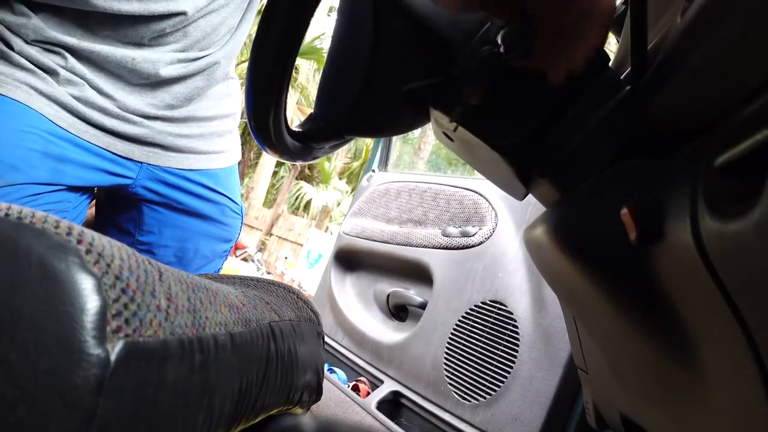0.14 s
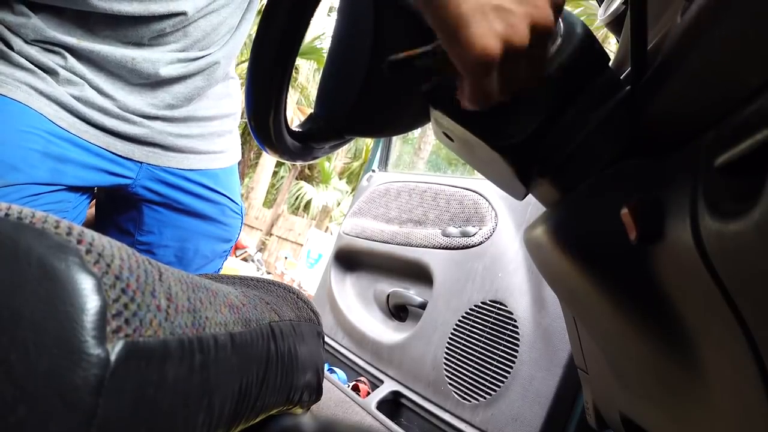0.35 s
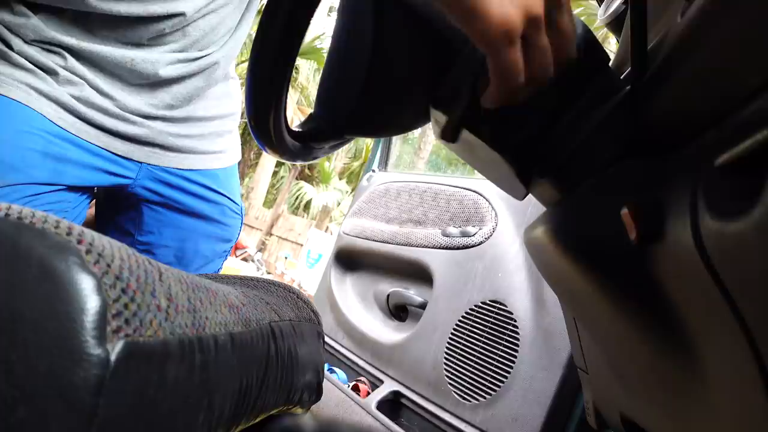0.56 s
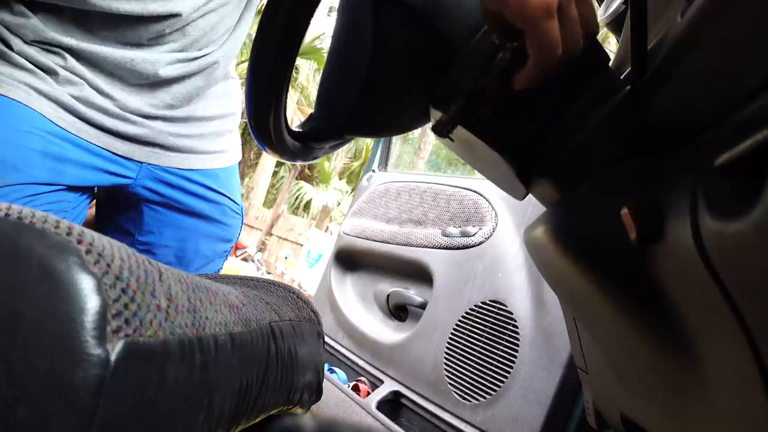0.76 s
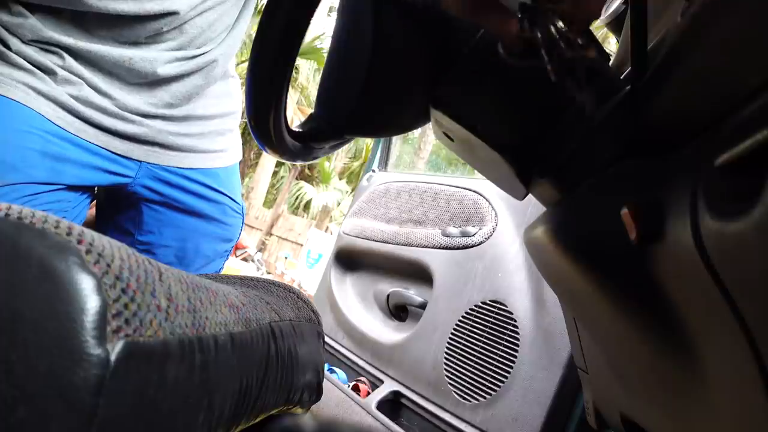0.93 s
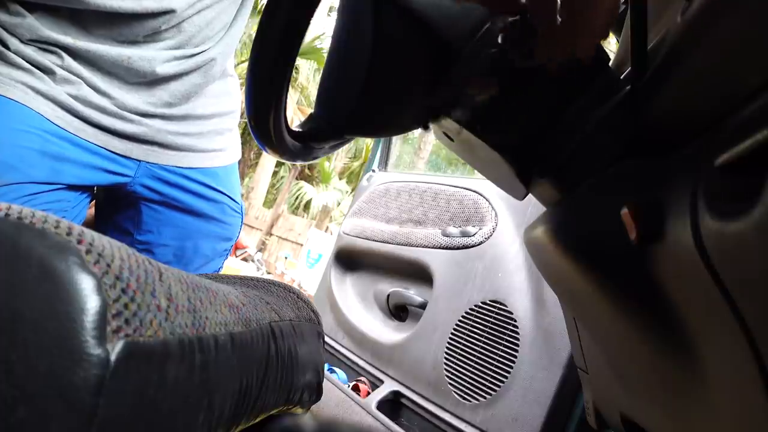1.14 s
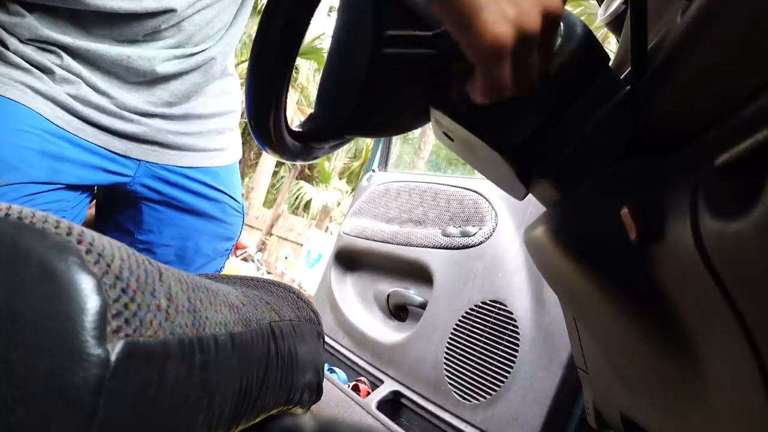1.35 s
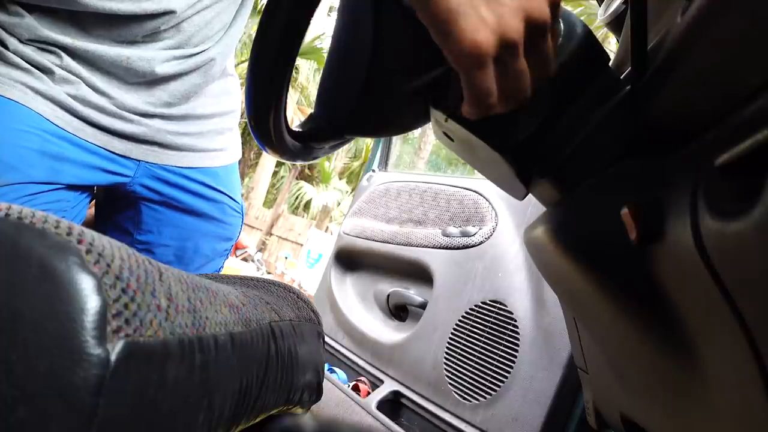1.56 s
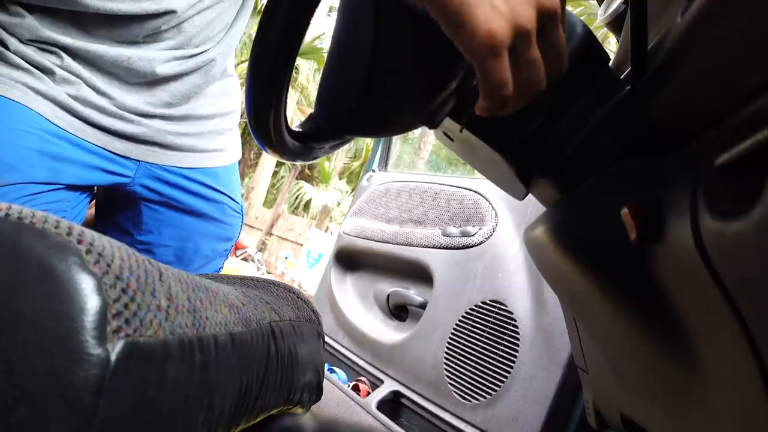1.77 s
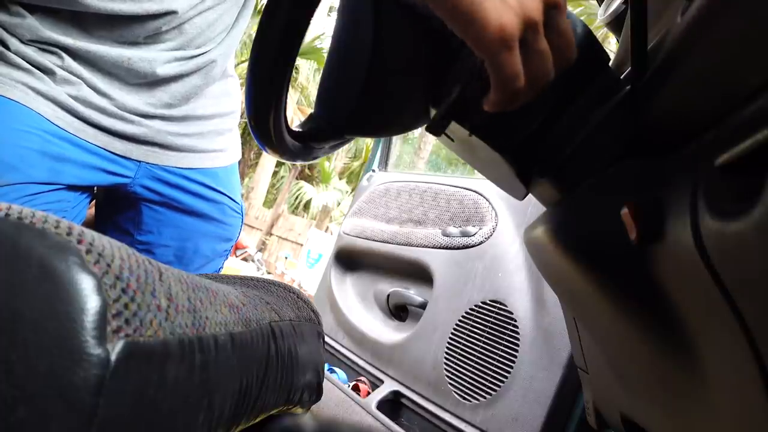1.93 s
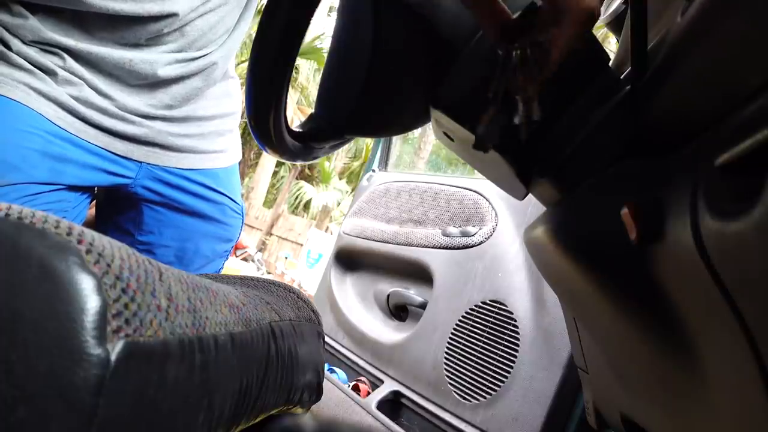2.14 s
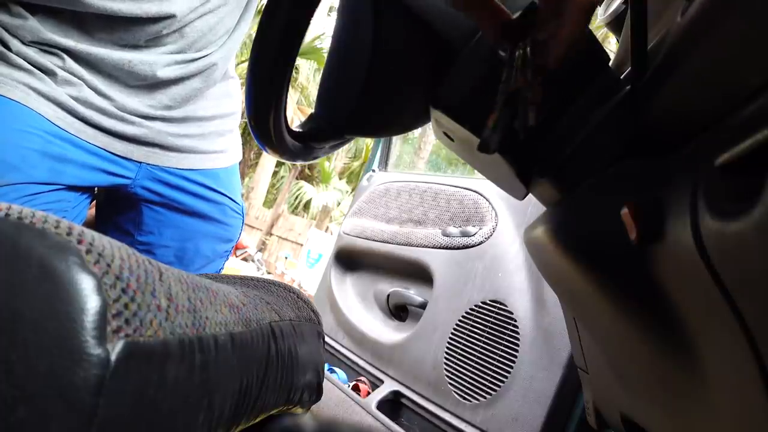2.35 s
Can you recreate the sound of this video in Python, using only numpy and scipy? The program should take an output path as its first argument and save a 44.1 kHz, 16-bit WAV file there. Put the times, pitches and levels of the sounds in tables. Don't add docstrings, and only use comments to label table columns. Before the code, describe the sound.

Car keys worked in an ignition lock: light ticks, then tight bursts of hard clunks, jingles and blade scrapes, a pause and a last knock; close, small dull cabin, low handling rumble, faint insects outside.

```python
import sys
import numpy as np
from scipy import signal
from scipy.fft import rfft, irfft
from scipy.io import wavfile
from scipy.ndimage import uniform_filter1d

SR = 44100
rng = np.random.default_rng(int(sys.argv[2]) if len(sys.argv) > 2 else 0)


def undo_db(level):
    steps = np.asarray(level, float) / 20
    return 10 ** steps


def put_to_file(sound):
    columns = np.atleast_2d(sound).T
    safe = np.clip(columns, -1, 1)
    whole_steps = np.round(safe * 32767)
    wavfile.write(sys.argv[1], SR, whole_steps.astype(np.int16))


N = 105840


def unit(x):
    return x / np.sqrt(np.mean(x ** 2))


def colour(x, table):
    hz, db = np.array(table).T
    f = np.maximum(np.arange(len(x) // 2 + 1) * SR / len(x), 1)
    gain_db = np.interp(np.log(f), np.log(hz), db, left=-70, right=-70)
    return unit(irfft(rfft(x) * undo_db(gain_db), len(x)))


def band(x, hz, width_hz):
    return signal.lfilter(*signal.iirpeak(hz, hz / width_hz, fs=SR), x)


def wide_band(x, hz, width_hz):
    return band(band(x, hz, width_hz), hz, width_hz)


def walk(rate_hz):
    k = int(SR / rate_hz)
    steps = np.repeat(rng.standard_normal(N // k + 1), k)
    return unit(uniform_filter1d(uniform_filter1d(steps, k), k)[:N])


def curve(rows):
    s, db = np.array(rows).T
    return undo_db(np.interp(np.arange(N) / SR, s, db))


def ring(modes, extra_db, size):
    hz, db, t60_s = np.array(modes).T[:, :, None]
    t = np.arange(size) / SR
    decay = undo_db(db + np.reshape(extra_db, (-1, 1)) - 60 * t / t60_s)
    return np.sum(decay * np.sin(2 * np.pi * hz * t), axis=0)


def peak_unit(x):
    return x / np.abs(x).max()


def add(out, s, x):
    i = max(int(s * SR), 0)
    out[i:i + len(x)] += x[:len(out) - i]


# f/Hz, density/dB
AIR_COLOUR = [(150, -8), (400, -7.5), (900, -8), (3000, -16.5), (6500, -23.5), (9500, -27.5),
              (12000, -26.5), (16000, -24)]


def air():
    noise = colour(rng.standard_normal(N), AIR_COLOUR)
    return noise * undo_db(-70 + 1.2 * walk(6))


# f/Hz, width/Hz, level/dB rms
INSECTS = [(4690, 100, -88), (5300, 110, -81.5), (8800, 2200, -83), (10000, 220, -84.5)]
# t/s, level/dB
INSECT_SWELL = [(0, -5), (1.2, -1), (1.6, 6.5), (2.4, 7)]


def insects():
    out = np.zeros(N)
    for hz, width_hz, db in INSECTS:
        chorus = unit(wide_band(rng.standard_normal(N), hz, width_hz))
        out += chorus * undo_db(db + walk(20) + walk(4))
    return out * curve(INSECT_SWELL)


# t/s, level/dB
RUMBLE_LEVEL = [(0, -42.5), (.45, -46.5), (.65, -57.5), (.85, -44), (1.4, -50.5), (1.48, -57), (1.7, -62),
                (1.92, -58), (2.05, -45.5), (2.2, -53), (2.4, -58)]
# f/Hz, density/dB
RUMBLE_COLOUR = [(20, 1), (50, -9), (105, -1), (200, -9), (450, -16), (900, -32)]


def rumble():
    noise = colour(rng.standard_normal(N), RUMBLE_COLOUR)
    return noise * undo_db(3 * walk(14) - 3) * curve(RUMBLE_LEVEL)


# t/s, level/dB, f/Hz
BUMPS = [(.015, -33, 106), (0.24, -31, 150), (.28, -28.5, 148), (.43, -48, 110), (0.728, -44.5, 100),
         (0.835, -32.5, 123), (0.877, -29, 168), (1.075, -37, 93), (1.177, -44.5, 95), (1.28, -30, 140),
         (1.345, -32, 200), (1.44, -44.5, 97), (1.963, -45, 100), (2.025, -36.5, 102), (2.131, -35.5, 120)]


def bumps():
    bump_s = .03
    out, t = np.zeros(N), np.arange(8192) / SR
    swell = t / bump_s * np.exp(1 - 3 * t / bump_s)
    for s, db, hz in BUMPS:
        lump = band(band(rng.standard_normal(8192), hz, hz), hz, 2 * hz) * swell
        add(out, s - bump_s / 4, undo_db(db) * peak_unit(lump))
    return out


# t/s, f/Hz, level/dB, t60/s
COVER = [
    (.289, 860, -12.5, .05),
    (.879, 1084, -15, 0.049),
    (1.347, 815, -14.5, .04),
    (2.127, 1050, -17.5, .03),
    (.318, 905, -28, 0.034),
    (1.359, 900, -20.5, 0.027),
]


def cover():
    out = np.zeros(N)
    for s, hz, db, t60_s in COVER:
        add(out, s, ring([(hz, db, t60_s)], 0, size=8192))
    return out


# f/Hz, level/dB, t60/s
FREE_KEY_MODES = [(2800, -20, .026), (7429, -11, .5), (8075, 0, .084), (11790, -19, .12), (14190, -12, .13)]
# t/s, level/dB
FREE_KEY_HITS = [
    (1.153, -19),
]
# t/s, f/Hz, level/dB, t60/s
SINGLE_MODE_RINGS = [(.066, 8075, -41, 0.049), (.068, 14190, -52, .06), (.092, 9800, -43, 0.037),
                     (0.096, 4650, -42, 0.045), (0.108, 11100, -53, .15), (.112, 8500, -56, .1),
                     (0.148, 7900, -36, .03), (0.169, 9800, -48, 0.047), (.447, 13200, -55, 0.032),
                     (0.514, 8500, -62, .1), (.548, 12600, -58, 0.026), (0.631, 13180, -62, .06),
                     (.65, 8500, -70, .1), (0.92, 9800, -53, .08), (1.032, 14190, -69, 0.11),
                     (1.032, 8075, -56, 0.055), (1.048, 9800, -58, .06), (1.052, 12900, -68, 0.088),
                     (2.043, 11000, -66, .1), (.134, 4750, -30, 0.066), (0.136, 11070, -35.5, 0.062),
                     (.140, 13200, -49, 0.15), (0.207, 8500, -42.5, .05), (.650, 13180, -65, .2),
                     (0.871, 8500, -12.5, 0.019), (0.882, 12590, -30.5, 0.063), (.920, 3600, -53, 0.16),
                     (.972, 8689, -45.5, 0.11), (.972, 12600, -51, .05), (1.045, 4640, -58, 0.07),
                     (1.208, 7430, -41.5, 0.27), (1.254, 9700, -26.5, 0.034), (1.27, 8500, -38.5, .03),
                     (1.211, 4700, -27, 0.023), (1.248, 4410, -29.5, .04), (1.303, 7430, -26.5, 0.043),
                     (1.353, 14140, -38.5, 0.13), (1.351, 8200, -34, 0.13), (1.391, 7300, -51, 0.24)]


def key_rings():
    free_s, damped_t60_s = .055, .08
    out, t = np.zeros(N), np.arange(16384) / SR
    damping = undo_db(-60 * np.maximum(t - free_s, 0) / damped_t60_s)
    for s, db in FREE_KEY_HITS:
        add(out, s, undo_db(db) * ring(FREE_KEY_MODES, 0, size=16384) * damping)
    for s, hz, db, t60_s in SINGLE_MODE_RINGS:
        add(out, s, ring([(hz, db, t60_s)], 0, size=16384) * damping)
    return out * undo_db(3 * walk(120))


# f/Hz, density/dB
SCRAPE_COLOUR = [(240, -31.5), (400, 1.5), (3470, -11), (5350, -19), (8370, -13), (16000, -38)]


def grit():
    clicks_per_s, spread_db, flutter_db, broad_share = 14000, 2.2, 2.5, .15
    strength = undo_db(spread_db * np.minimum(rng.exponential(size=N), 4))
    clicks = (rng.random(N) < clicks_per_s / SR) * rng.standard_normal(N) * strength
    centres_hz = np.geomspace(600, 14500, num=16)
    owner = rng.integers(len(centres_hz), size=N)
    parts = np.zeros(N)
    for k, hz in enumerate(centres_hz):
        part = unit(band(band(clicks * (owner == k), hz, hz / 4), hz, hz / 2))
        parts += part * np.sqrt(hz) * undo_db(flutter_db * walk(120))
    return colour(unit(parts) + broad_share * unit(clicks), SCRAPE_COLOUR)


# t/s, length/s, level/dB, brightness (half the lift above 3 kHz)/dB
SCRAPE = [(.005, 0.0096, -33.5, -25), (0.044, 0.26, -46.5, -4), (0.193, 0.038, -42.5, 3),
          (0.234, 0.048, -32.5, 1.5), (0.27, 0.047, -27.5, -1.5), (0.346, 0.074, -56.5, -4),
          (0.413, 0.052, -52.5, -2.5), (0.633, 0.013, -59, -3.5), (0.676, 0.094, -58.5, -3.5),
          (0.814, 0.11, -39.5, 0.5), (0.864, 0.026, -30.5, 4), (0.95, 0.06, -42.5, -4.5),
          (1.063, 0.014, -42.5, -12), (1.09, 0.079, -64, -0.5), (1.177, .065, -40.5, 3),
          (1.251, 0.14, -32, 0), (1.411, 0.011, -41, 2), (1.94, 0.039, -49.5, -10),
          (2.006, 0.042, -44.5, -3.5), (2.108, 0.059, -35.5, 1.5), (2.391, 0.048, -48.5, -6)]


def scrape():
    rise_s, fall_s, sag_db = .0035, .0076, -4
    rough = grit()
    low = signal.lfilter(*signal.butter(2, 3000, fs=SR), rough)
    out, t = np.zeros(N), np.arange(N) / SR
    for s, length_s, db, bright_db in SCRAPE:
        attack = np.clip((t - s) / rise_s, 0, 1)
        release = np.exp(-np.clip(t - s - length_s, 0, 1) / fall_s)
        level = undo_db(db + sag_db * np.clip((t - s) / length_s, 0, 1))
        out += level * attack * release * (low + undo_db(2 * bright_db) * (rough - low))
    return out


# t/s, peak level/dB, f/Hz
TICKS_A = [(0.0054, -18, 8800), (0.0656, -24, 8100), (0.1347, -20, 4830), (0.1658, -23, 3990),
           (0.239, -1.5, 4340), (0.2738, -4, 3040), (0.2865, 0.5, 3900), (0.2912, -5, 6200),
           (0.298, -3.5, 6100), (0.3114, -7, 5400), (0.4214, -29, 3430), (0.4902, -28.5, 3740),
           (0.5122, -41, 5270), (0.5459, -32, 7140), (0.5516, -29, 7560), (0.7682, -39, 3830),
           (0.832, -5, 3280), (0.8729, -8, 8800), (0.8807, -7.5, 3400), (0.9182, -27, 9500),
           (0.9514, -30.5, 7600)]
# t/s, peak level/dB, f/Hz
TICKS_B = [(1.0678, -21.5, 7300), (1.1524, -13, 8500), (1.2095, -10.5, 4500), (1.2485, -16, 4600),
           (1.284, -4, 3280), (1.3037, -12, 6800), (1.3232, -4.5, 3530), (1.3458, -2.5, 3390),
           (1.3592, -15.5, 6440), (1.4137, -28.5, 7900), (1.9595, -38, 7000), (1.9683, -29.5, 4850),
           (2.031, -29.5, 3460), (2.1216, -7, 4800), (2.2205, -34, 6100), (2.226, -27, 4700),
           (2.2598, -29.5, 5840)]
# t/s, peak level/dB, f/Hz
TICKS_FAINT = [(.0418, -40, 5000), (.0852, -37, 4160), (.0947, -33, 4620), (.2004, -25.5, 2740),
               (.2125, -35, 12500), (.3753, -53, 2930), (.446, -36, 6500), (.4725, -49, 3200),
               (.523, -41, 3000), (.5525, -35, 3040), (.565, -48, 4180), (.578, -64, 3550),
               (.636, -49, 4440), (.674, -53.5, 5020), (.971, -38, 5900), (.9966, -34.5, 3520),
               (1.004, -43, 6000), (1.046, -44.5, 4000), (1.0635, -43.5, 3000), (1.076, -43, 13600),
               (1.098, -42, 9000), (1.38, -32, 5500), (1.5605, -47, 7530), (1.9415, -40.5, 2500),
               (2.108, -34, 4000)]


def ticks(table):
    rise_s, fall_s, trim_db = .0006, .0018, -2.5
    broad_db, soft_share = -5.5, .26
    out, t = np.zeros(N), np.arange(512) / SR
    envelope = np.exp(-t / fall_s) * (1 - np.exp(-t / rise_s))
    for s, db, hz in table:
        crack = rng.standard_normal(512) * envelope
        broad = undo_db(broad_db + soft_share * db) * band(crack, 4000, 9000)
        tick = wide_band(crack, hz, hz) + broad
        add(out, s, undo_db(db + trim_db) * peak_unit(tick))
    return out


# t/s, peak level/dB, lean to hollow low modes/dB
CLUNKS = [(0.019, -26.5, 21), (0.042, -42, 7), (0.112, -20.5, -14), (0.167, -21, -15), (0.239, -3, -40.5),
          (0.2751, 0.5, -37), (0.2812, -14.5, 10.5), (0.2897, -8, 30), (0.423, -24.5, 1),
          (0.689, -29.5, -5.5), (0.73, -21.5, -1), (0.769, -27.5, 23), (0.834, -1, -40.5),
          (0.872, -19.5, -24.5), (0.877, -12.5, -9), (0.96, -20, 9.5), (0.997, -32, -21), (1.07, -31, -15),
          (1.184, -18.5, -19), (1.286, -2.5, -28), (1.324, -0.5, -57.5), (1.346, -7, -8),
          (1.3495, -5.5, -27), (1.473, -35.5, -5.5), (1.528, -29, -6), (1.561, -37, 2.5), (1.966, -27, -11),
          (2.018, -23.5, -29.5), (2.031, -31, -6), (2.122, 0.5, -26.5), (2.393, -44, -5.5)]
# f/Hz, level/dB, t60/s
HOUSING_LOW = [(510, -7, .022), (835, -2, .022), (1085, -2, .02)]
# f/Hz, level/dB, t60/s
HOUSING_HIGH = [(1480, -10, .03), (1650, -7, .02), (1750, -2, .024), (1830, 0, .028), (3340, -17, .012),
                (4080, -21, .01)]


def clunks():
    trim_db, base_lean_db, scatter_db = -4, 6, 1.5
    swell_s, free_s, caught_db = .0022, .0055, -10
    knock_db, knock_hz, knock_s, knock_soft_share = -5, 1340, .0043, .17
    thump_db, thump_hz, thump_s = -30, 137, .0077
    out, t = np.zeros(N), np.arange(4096) / SR
    swell = 1 - np.exp(-(t / swell_s) ** 2)
    catch = undo_db(caught_db * np.clip((t - free_s) / swell_s, 0, 1))
    thump_tone = np.sin(2 * np.pi * thump_hz * t) * np.exp(-t / thump_s)
    for s, db, lean_db in CLUNKS:
        noise = rng.standard_normal(4096) * np.exp(-t / knock_s)
        mode_db = scatter_db * rng.standard_normal(9)
        low = ring(HOUSING_LOW, mode_db[:3], size=4096)
        high = ring(HOUSING_HIGH, mode_db[3:], size=4096)
        body = (high + undo_db(base_lean_db + lean_db) * low) * swell * catch
        knock = wide_band(noise, knock_hz, 2 * knock_hz)
        thump = band(noise, thump_hz, thump_hz) + thump_tone
        blow = peak_unit(body) + undo_db(knock_db - knock_soft_share * db) * peak_unit(knock)
        add(out, s - swell_s / 2, undo_db(db + trim_db) * (peak_unit(blow) + undo_db(thump_db) * thump))
    return out


def cabin(near):
    t60_s, top_hz, gap_s = .05, 6170, .002
    t = np.arange(8192) / SR
    noise = signal.lfilter(*signal.butter(1, top_hz, fs=SR), rng.standard_normal(8192))
    echo = noise * undo_db(-60 * t / t60_s) * (t > gap_s)
    return signal.fftconvolve(near, echo / np.sqrt(np.sum(echo ** 2)))[:N]


def scene():
    background = rumble() + air() + insects()
    all_ticks = ticks(TICKS_A) + ticks(TICKS_B) + ticks(TICKS_FAINT)
    near = cover() + scrape() + all_ticks + clunks()
    near = signal.lfilter(*signal.butter(2, 200, "high", fs=SR), near)
    return (near + undo_db(-9) * cabin(near) + key_rings() + bumps() + background)[None]


def band_limit(x):
    return signal.sosfilt(signal.butter(12, 17000, fs=SR, output="sos"), x)


def record(dry):
    ceiling, top_hz = 1.05, 15700
    soft = ceiling * np.tanh(dry / ceiling)
    low_pass = signal.ellip(6, .5, 40, top_hz, fs=SR, output="sos")
    return band_limit(signal.sosfilt(low_pass, soft))


dry = scene()
out = record(dry)
put_to_file(out)
```